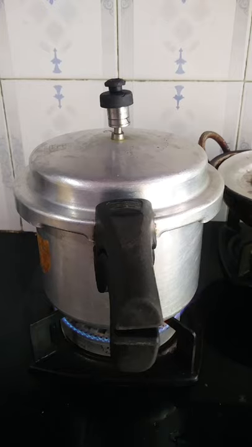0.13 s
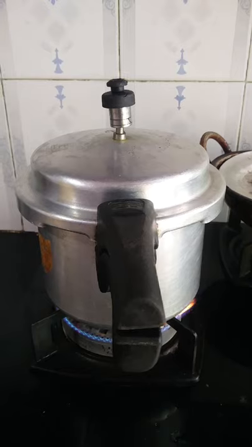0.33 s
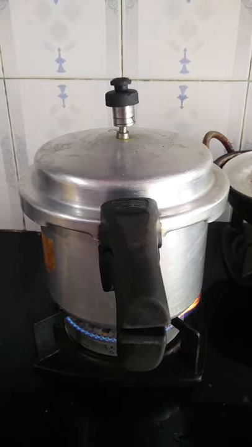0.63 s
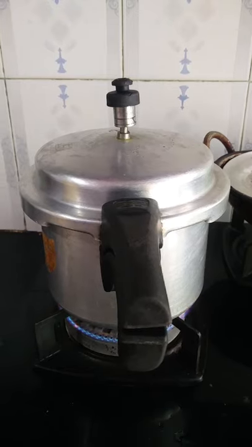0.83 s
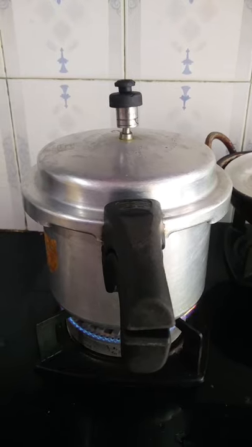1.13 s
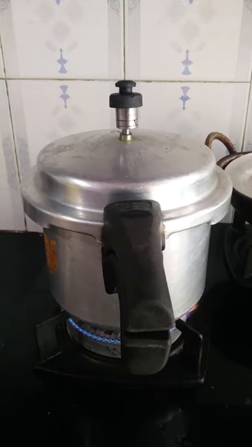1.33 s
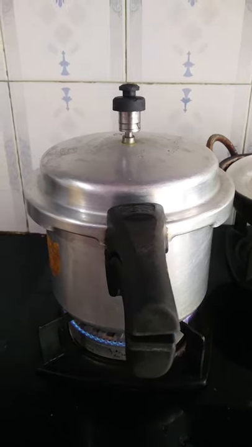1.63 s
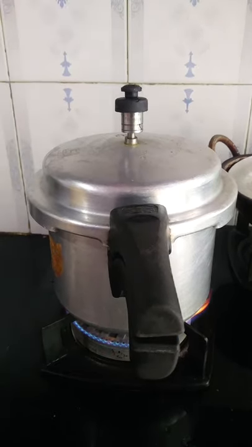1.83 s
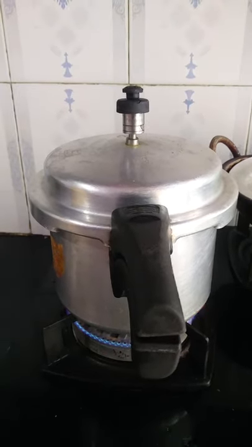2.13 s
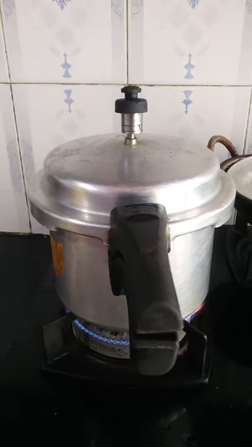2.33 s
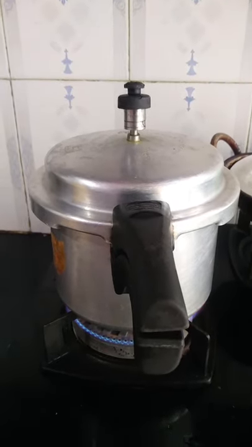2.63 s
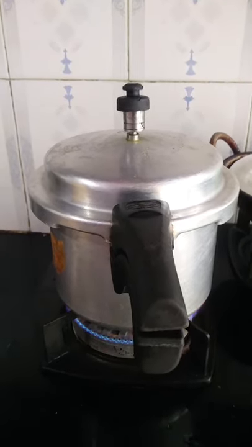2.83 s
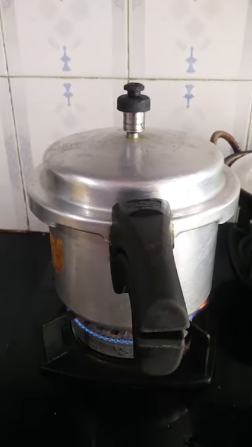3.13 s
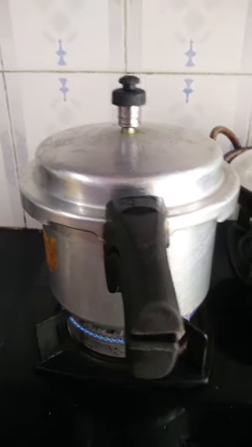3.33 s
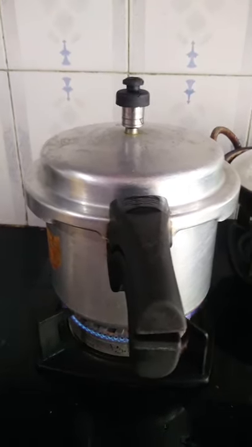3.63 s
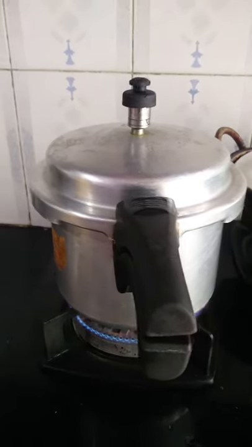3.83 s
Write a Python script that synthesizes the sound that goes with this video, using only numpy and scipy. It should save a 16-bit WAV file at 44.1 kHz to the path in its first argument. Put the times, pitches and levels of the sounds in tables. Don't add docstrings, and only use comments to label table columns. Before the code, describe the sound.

Pressure cooker steam hisses loudly and sputters, then stops with a clack before faint birdsong.

```python
import sys
import numpy as np
from scipy import signal
from scipy.fft import rfft, irfft
from scipy.io import wavfile
from scipy.ndimage import uniform_filter1d

SR = 44100
rng = np.random.default_rng(int(sys.argv[2]) if len(sys.argv) > 2 else 0)


def generate_wav(sig):
    pcm = np.round(np.clip(np.atleast_2d(sig).T, -1, 1) * 32767).astype(np.int16)
    wavfile.write(sys.argv[1], SR, pcm)


def voltage_ratio(decibels):
    exponent = np.asarray(decibels, float) / 20
    return 10 ** exponent


N = 176400
T = np.arange(N) / SR
HZ = np.fft.rfftfreq(N, 1 / SR)
ROOM_T60_S, ROOM_WET_DB, ROOM_GAP_S = 0.24, -2, 0.0029


def unit(x):
    return x / np.sqrt(np.mean(x ** 2))


def white(*channels):
    parts = rng.standard_normal((*channels, len(HZ), 2))
    return np.sqrt(N / 2) * parts.view(complex)[..., 0]


def shape(points, hz):
    p = np.array(points, float)
    return np.interp(np.log(hz + 1), np.log(p[:, 0]), p[:, 1])


def colour(x, points):
    return irfft(rfft(x) * voltage_ratio(shape(points, HZ)), N)


def bell(hz, width):
    return np.exp(-2 * ((HZ - hz) / width) ** 2)


def band(spectrum, hz, width):
    return irfft(spectrum * bell(hz, width), N)


def walk(rate):
    held = np.repeat(rng.standard_normal(int(rate * 4) + 2), 4)
    knots = uniform_filter1d(held, size=4)
    return unit(np.interp(T, np.arange(len(knots)) / rate / 4, knots))


def swell(start, rise, hold, fall):
    t = T - start
    return np.clip(t / rise, 0, 1) ** 2 * np.exp(-np.clip(t - rise - hold, 0, None) / fall)


def space(x, t60, wet_db, gap):
    t = T[:SR]
    tail = rng.standard_normal((2, SR)) * np.exp(-np.log(1000) * t / t60)
    tail *= np.clip(t / gap - 1, 0, 1)
    tail *= voltage_ratio(wet_db) / np.sqrt(np.sum(tail ** 2, axis=1, keepdims=True))
    return x + signal.fftconvolve(tail, x[None], axes=1)[:, :N]


def house():
    # pitch_hz, level_db
    floor_colour = [(40, -14), (150, -2), (400, -10.5), (520, -9), (900, -13), (1600, -25.5), (6000, -26),
                    (9000, -49)]
    # pitch_hz, width_hz, level_db
    hum_tones = [(130, 14, -73.5), (162, 14, -75.5), (526, 19, -76), (603, 30, -80)]
    # start_s, pitch_hz, width_hz, level_db,
    # length_s
    far_sounds = [(3.08, 4590, 450, -48, .03), (3.397, 700, 500, -82, 0.051),
                  (3.548, 820, 280, -64.5, 0.11), (3.553, 1430, 450, -69.5, 0.092),
                  (3.733, 2350, 220, -68.5, .06), (3.738, 2710, 52, -67.5, .04),
                  (3.762, 1460, 100, -70, 0.022), (3.83, 759, 21, -64, 0.066), (3.8, 2210, 21, -84, 0.19),
                  (3.864, 530, 51, -66, .05), (3.975, 504, 170, -56, .05)]
    floor_db, floor_right_db, knock_right_db = -66.5, -3, -11.5
    rise_s, fall_s = 0.0075, 0.036

    hum = np.array([colour(rng.standard_normal(N), floor_colour) * voltage_ratio(walk(10)) for _ in range(2)])
    out = unit(hum) * voltage_ratio([[floor_db], [floor_db + floor_right_db]])
    air = white(2)
    for hz, width, db in hum_tones:
        out = out + voltage_ratio(db) * unit(band(air, hz, width))
    for start, hz, width, db, length in far_sounds:
        knock = unit(band(air, hz, width)) * swell(start, rise_s, length, fall_s)
        out = out + knock * voltage_ratio([[db], [db + knock_right_db]])
    return out


def bird():
    # start_s, top_pitch_hz, level_db
    calls = [
        (3.273, 4420, -33),
        (3.576, 4235, -39),
        (3.972, 4246, -39.5),
    ]
    rise_s, hold_s, fall_s = .016, 0.011, .011
    drop_hz, scoop_hz, scoop_s = 600, 150, .004
    lead_db, lead_s = -24, .038
    rough_db, right_db = 1.5, -14
    yard_t60_s, yard_wet_db, yard_gap_s = 0.36, -1.5, .004

    out = np.zeros(N)
    wobble_hz = 25 * walk(160)
    for start, hz, db in calls:
        sag = np.clip((T - start - rise_s - hold_s / 2) / .045, 0, 1) ** 1.5
        scoop = (T > start) * np.exp(-np.abs(T - start) / scoop_s)
        pitch_hz = hz + wobble_hz - drop_hz * sag - scoop_hz * scoop
        tone = np.sin(2 * np.pi * np.cumsum(pitch_hz) / SR)
        lead_in = voltage_ratio(lead_db) * swell(start - lead_s, 0.02, 0.016, 0.012)
        out += voltage_ratio(db) * tone * (swell(start, rise_s, hold_s, fall_s) + lead_in)
    rough = out * voltage_ratio(rough_db * walk(110))
    return space(rough, yard_t60_s, yard_wet_db, yard_gap_s) * voltage_ratio([[0], [right_db]])


def weight():
    # start_s, level_db
    clacks = [
        (3.004, -22.5),
        (3.023, -29),
    ]
    # pitch_hz, level_db, t60_s
    lid_modes = [(175, -2.5, 0.043), (567, -10, 0.087), (822, -7, 0.058), (987, -4, 0.072),
                 (1237, 0, 0.041), (1530, -13.5, 0.036), (2130, -1, 0.034), (2760, -4.5, 0.036),
                 (2690, -7, 0.069), (3540, -9.5, .03)]
    # pitch_hz, level_db
    knock_colour = [(90, -23.5), (200, 3), (450, -1), (1100, 0), (2600, -3), (4000, -27.5)]
    knock_db, knock_fall_s, ring_db, right_db = -29.5, .006, -6.5, -1.5

    out, knock_level, t = np.zeros(N), 0, T[:SR // 4]
    for start, db in clacks:
        knock_level = knock_level + voltage_ratio(db - clacks[0][1]) * swell(start, 0.0027, 0.00033, knock_fall_s)
        for (hz, mode_db, t60), odd in zip(lid_modes, rng.standard_normal((len(lid_modes), 2))):
            phase = 2 * np.pi * hz * (1 + 0.034 * odd[1]) * t + 2.6 * odd[0]
            ring = np.cos(phase) * np.exp(-np.log(1000) * t / t60)
            first = int(start * SR)
            out[first:first + len(t)] += voltage_ratio(db + mode_db + ring_db + 2.0 * odd[0]) * ring
    out += voltage_ratio(knock_db) * knock_level * unit(colour(rng.standard_normal(N), knock_colour))
    return space(out, ROOM_T60_S * 1.4, -1.5, ROOM_GAP_S) * voltage_ratio([[0], [right_db]])


def valve(x, side):
    # pitch_hz, width_hz, left_lift_db, right_lift_db
    cavities = [(4420, 42, 2, -2), (5010, 60, 4, 3), (5340, 50, 2.5, 1), (5530, 34, 0, 0.5),
                (5720, 61, 5.5, 5.5), (7360, 60, 0.5, 5)]
    lift_db = sum(row[2 + side] * bell(row[0], row[1]) for row in cavities)
    return irfft(rfft(x) * voltage_ratio(lift_db), N)


def turbulence(flow_db):
    jet_db, flicker_db, sputter_db, shifting_db = 8, 0.96, 1.5, 2.5
    jet = 0
    for hz in 140 * 2 ** np.arange(0, 6.6, .6):
        jet = jet + voltage_ratio(flicker_db * walk(30)) * band(white(), hz, hz * .5)
    jet = jet * voltage_ratio(jet_db + flow_db + sputter_db * walk(500))
    hold = np.exp(-2 * np.log(1000) / ROOM_T60_S / SR)
    room_power = signal.lfilter([1 - hold], [1, -hold], voltage_ratio(2 * flow_db))
    shifting = rng.standard_normal((2, N)) * np.sqrt(room_power)
    return space(jet, ROOM_T60_S, ROOM_WET_DB, ROOM_GAP_S) + voltage_ratio(jet_db + shifting_db - 1) * shifting


def port_crackle(flow_db, start_db):
    # pitch_hz, level_db
    crackle_colour = [(30, -28), (60, -6.5), (130, -0.5), (300, -2), (1000, 0), (2200, -4.5), (4000, -21.5),
                      (9000, -59.5)]
    level_db, growth, pops_per_s, spread_db, left_db = -14, 1.62, 7000, 4, -19.5
    happens, sign, size = rng.random((3, 2, N))
    pops = (happens < pops_per_s / SR) * np.sign(sign - .5) * voltage_ratio(-spread_db * np.log(size + 2e-3))
    pressure_db = level_db + start_db + growth * (flow_db - start_db) + 1.1 * walk(40)
    return unit(colour(pops, crackle_colour)) * voltage_ratio(pressure_db) * voltage_ratio([[left_db], [0]])


def steam():
    # start_s, flow_db, left_port_lift_db (as the hand turns)
    venting = [(0, -17, 3), (.25, -16.5, 3), (.45, -18, 4), (0.671, -19, 2.5), (0.779, -18, 5.5),
               (1.0, -17.5, 3), (1.151, -18.5, 4), (1.27, -19, 2), (1.581, -21.5, 0.5), (1.801, -20, 1.5),
               (2.049, -19, 1), (2.55, -19.5, -0.5), (2.882, -20, 0.5), (2.951, -23.5, -7),
               (2.991, -26.5, -4)]
    # pitch_hz, level_db
    left_colour = [(100, -43), (1300, -26), (2300, -13.5), (4000, -9), (4500, -3), (5600, 0), (6800, -12.5),
                   (7400, -35)]
    right_colour = [(900, -27.5), (2300, -11), (4000, -8), (5700, -2), (7200, -7), (8000, -15), (9250, -19),
                    (9650, -71.5)]
    shut_s, shut_db_per_s, swell_db = 2.983, 901, 0.81
    port_hz, port_width_hz, port_lag_s = 4850, 550, .00018

    start_s, level_db, port_lift_db = np.array(venting, float).T
    flow_db = np.interp(T, start_s, level_db) - shut_db_per_s * np.clip(T - shut_s, 0, None)
    flow_db = flow_db + swell_db * (walk(9) + walk(25))
    left, right = turbulence(flow_db)
    left = np.roll(colour(valve(left, side=0), left_colour), int(port_lag_s * SR))
    port_gain = voltage_ratio(np.interp(T, start_s, port_lift_db))
    left = left + (port_gain - 1) * band(rfft(left), port_hz, port_width_hz)
    right = colour(valve(right, side=1), right_colour)
    fade = np.clip(10 * (shut_s + .8 - T), 0, 1)
    return fade * np.array([left, right]) + port_crackle(flow_db, level_db[0])


def scene():
    return house() + bird() + weight() + steam()


def band_limit(x):
    return signal.sosfilt(signal.butter(12, 9970, fs=SR, output="sos"), x)


def record(dry):
    low_cut_hz, top_hz = 59.6, 10000
    rounded = dry / (1 + dry ** 4) ** .25
    low_cut = signal.butter(2, low_cut_hz, "high", fs=SR, output="sos")
    top_cut = signal.ellip(10, .2, 80, top_hz, fs=SR, output="sos")
    mix = signal.sosfilt(top_cut, signal.sosfilt(low_cut, rounded))
    return band_limit(mix)


dry = scene()
out = record(dry)
generate_wav(out)
```